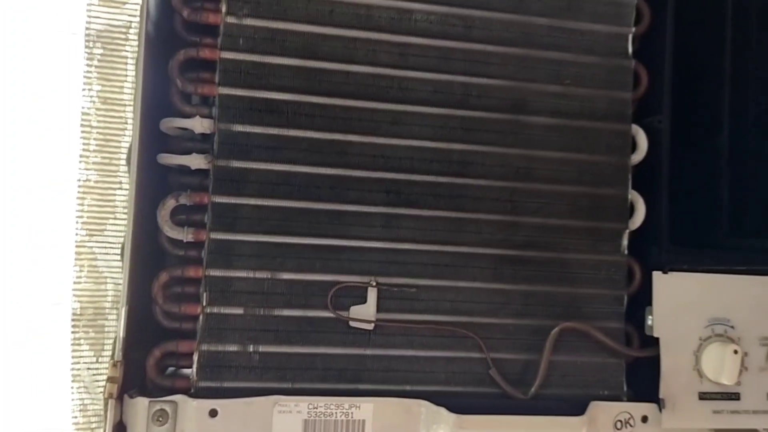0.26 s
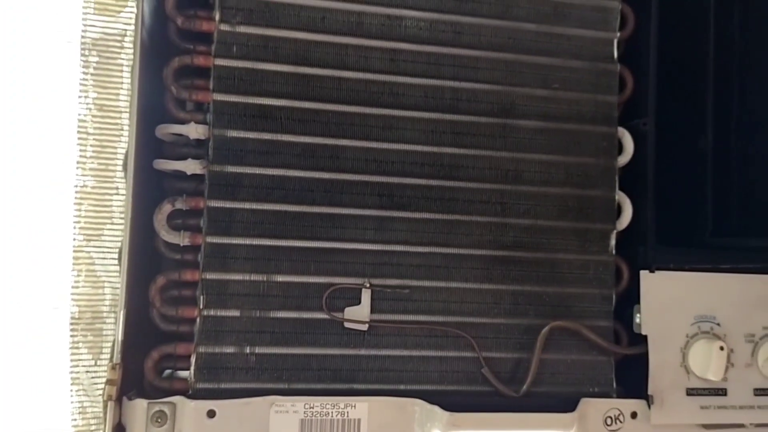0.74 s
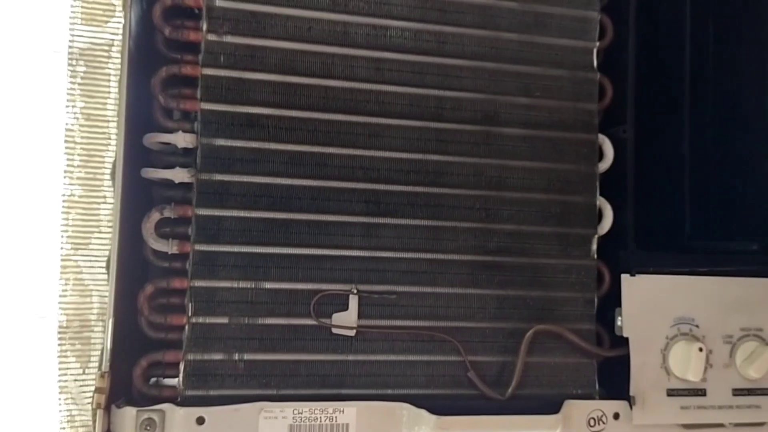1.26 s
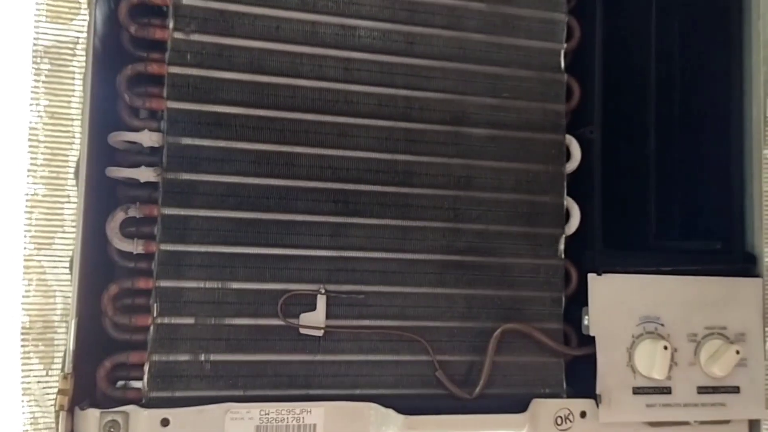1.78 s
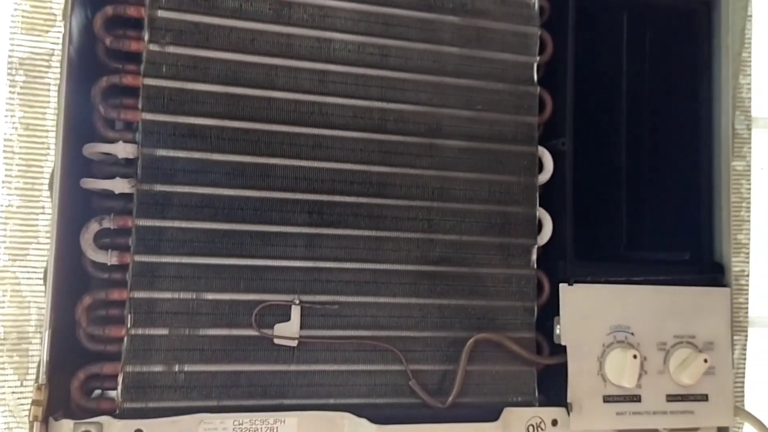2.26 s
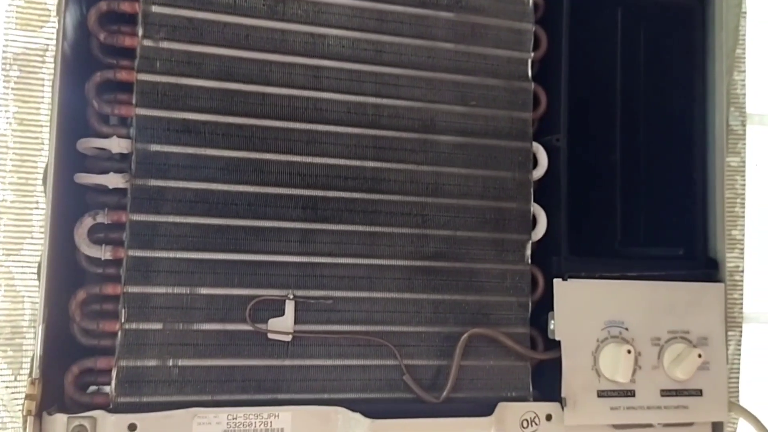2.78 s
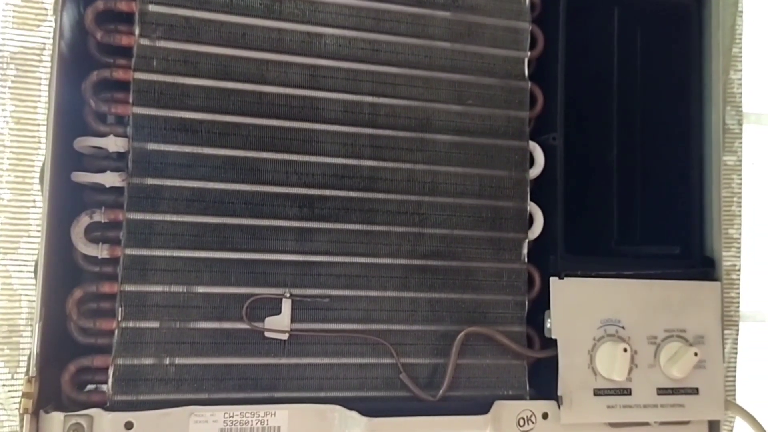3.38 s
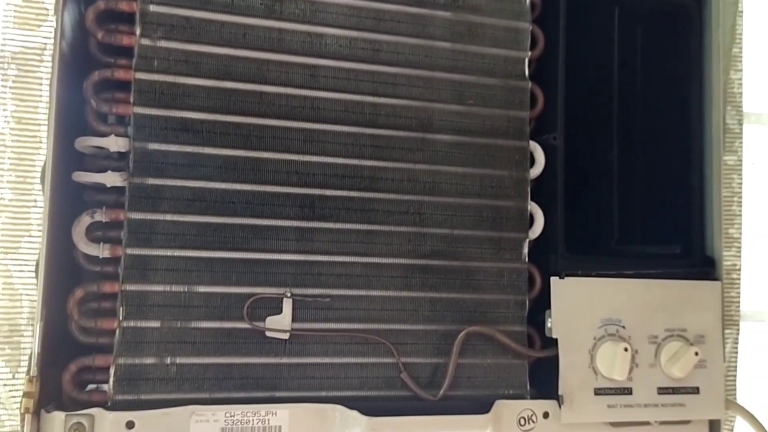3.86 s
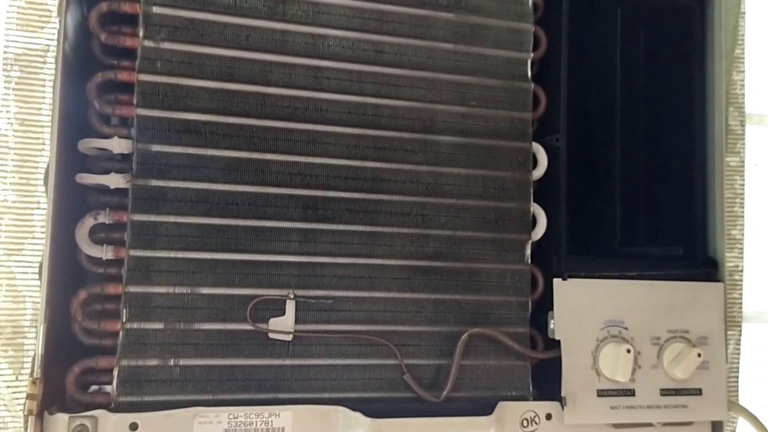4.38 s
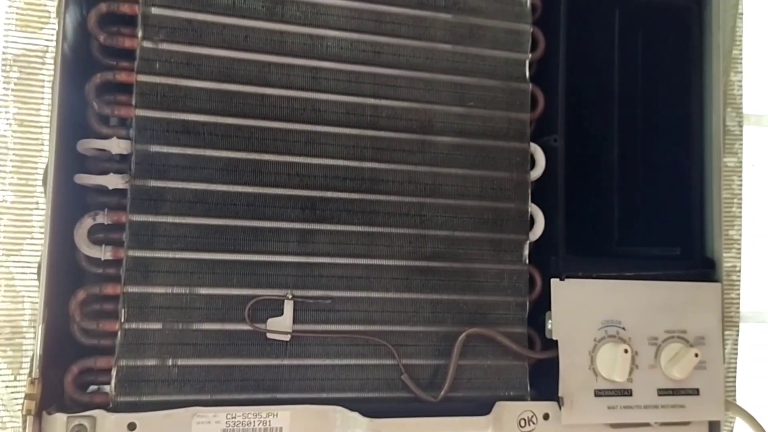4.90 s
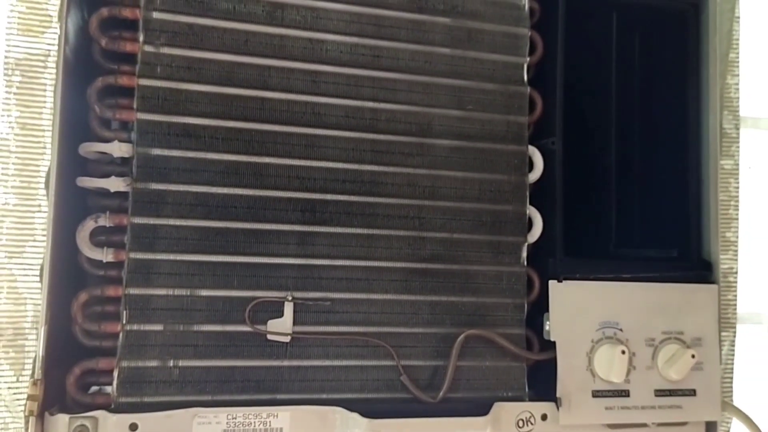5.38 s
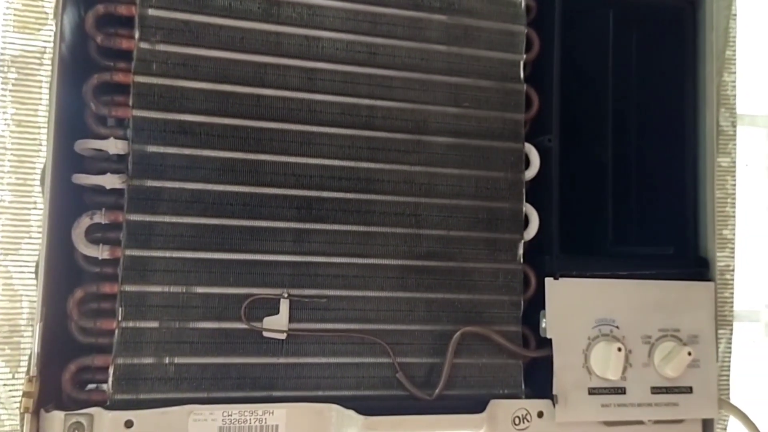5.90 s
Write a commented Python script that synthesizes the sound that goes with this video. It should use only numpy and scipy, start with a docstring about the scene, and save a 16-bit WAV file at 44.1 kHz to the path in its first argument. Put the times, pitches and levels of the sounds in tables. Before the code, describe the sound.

Indoors, close to an open window air conditioner, a deep steady compressor and fan hum throbs about three times a second beneath a soft rush of air. Thin whistles fade early as the hiss softens slightly. A single sharp tap hits the left side about one second in; later come faint ticks, light brushing and one dull, quiet knock. Handheld stereo microphone.

```python
"""Indoors, a window air conditioner runs steadily, its front cover off, close to a hand-held camera.
Its compressor sounds multiples of a shaft speed just below the mains; against the fan motor's magnetic
hum they beat about three times a second. The blower wheel adds tones, the cabinet faint steady ones.
Turbulent air rushes and hisses through the coil fins as shaped noise, with thin whistles at first.
One tap rings the camera by the left microphone; faint ticks, brushing puffs and a dull knock follow."""
import sys
import numpy as np
from scipy import signal
from scipy.fft import rfft, irfft, next_fast_len
from scipy.io import wavfile
from scipy.ndimage import uniform_filter1d

SR = 44100
rng = np.random.default_rng(int(sys.argv[2]) if len(sys.argv) > 2 else 0)


def generate_wav(signal):
    """Clip the signal to [-1, 1] and save it as 16-bit WAV at the path in sys.argv[1]."""
    frames = np.transpose(np.atleast_2d(signal))
    scaled = np.clip(frames, -1, 1) * 32767
    pcm = np.round(scaled).astype(np.int16)
    wavfile.write(sys.argv[1], SR, pcm)


N = 270789
TIME = np.arange(N) / SR  # s

MAINS_HZ, FAN_HZ = 59.842, 14.94  # supply frequency; turns of the blower wheel a second
# compressor shaft: turns a second at the start, slowly sagging under load
SHAFT_HZ, SAG_HZ_PER_S = 58.301, .0072
# the camera draws back from the fins, and their hiss falls from near to far
BACK_FROM_S, BACK_TAKES_S, NEAR_DB, FAR_DB = 0.63, 1.2, 1.0, -1.7
# it also turns: middle, half length, and extra delay of the hum at the left microphone before the turn
TURN_S, TURN_TAKES_S, TURN_DELAY_S = 3.7, 1, 0.000061
# on its way it crosses a crest of the hum's standing wave; HUM_DB is the gain away from the crest
CREST_S, CREST_WIDTH_S, CREST_DB, HUM_DB = 2.33, 0.89, 1.0, -0.64
EDGE_HZ = 15500  # upper band limit of the recorder

# strong compressor tones, before the standing wave:
# (multiple of shaft speed, left level [dB], right level [dB], extra level before the camera turns [dB])
SHAFT_TONES = [(1, -63, -61, 0), (2, -48.6, -48.2, 0), (3, -54.5, -56.5, 0), (4, -47.7, -49.3, 0),
               (5, -72, -70.5, 0), (6, -67, -64.3, 0), (7, -76, -75, 0), (8, -62.2, -60, 0),
               (9, -63, -60.7, 2), (10, -69.5, -70.5, 0), (11, -85, -78, 0), (12, -70.5, -73.5, 0),
               (13, -65.2, -75.5, 0), (14, -79, -72.5, 0), (17, -76, -75.5, 0), (18, -73.2, -69.5, 0),
               (21, -77, -87, 0), (24, -69, -74, -3.5), (25, -73, -80.5, 0), (26, -67.8, -77, 1.5),
               (27, -84, -77.5, 0), (28, -77, -83, 0), (29, -82, -83, 0), (63, -88, -87, 0),
               (76, -86, -90, 0)]
# buzz of valve and shell, filling in all other multiples: (frequency [Hz], level of each harmonic [dB])
SHELL_BUZZ = [(300, -71), (850, -75), (1250, -85), (1500, -80), (1700, -87), (2400, -94), (3100, -104),
              (3700, -95), (4300, -88), (5100, -98), (5800, -106), (6700, -100), (7700, -95), (9700, -108)]
# magnetic hum of the fan motor: (multiple of mains, level [dB], time in step with compressor [s])
MAGNETIC_HUM = [(2, -49.1, .287), (4, -65, .17)]
# blower wheel, the highest being the passing of its blades: (multiple of wheel speed, level [dB])
WHEEL_TONES = [(5, -65), (9, -58), (44, -71.5)]
# faint steady tones of the cabinet: (frequency [Hz], level [dB])
CABINET_TONES = [(189.7, -82), (203.4, -65), (204.6, -62.5), (306, -79.5), (422.7, -75)]
# rush of air, before the resonances: (frequency [Hz], spectral density [dB per Hz])
AIR_SPECTRUM = [(20, -99.6), (55, -93), (85, -81.5), (160, -76.5), (330, -84.8), (400, -82.8), (600, -86),
                (850, -88.3), (1150, -89.6), (1350, -92.2), (2400, -97.2), (3000, -102), (4400, -102.6),
                (5700, -108), (7300, -105.3), (9000, -109.3), (15300, -116)]
# resonances and notches of the air path: (frequency [Hz], width [Hz], level change [dB])
AIR_PATH = [(129, 8.1, 12), (200, 48, 3.5), (241.3, 7.2, 12.5), (254, 14, -4.5), (275, 70, 6.5),
            (324, 9.9, -2.5), (439.6, 18, 5.5), (469.7, 8.1, 13.8), (482, 8, -2.5), (517, 49, 6),
            (560, 7.4, -1), (581.5, 17, 7.5), (644, 12.3, 7.5), (755, 21, 6), (2630, 350, 0.4),
            (3020, 4000, -2), (4270, 310, 2.5), (5400, 620, -1)]
# level difference of the two microphones: (frequency [Hz], left minus right [dB])
MIC_LEAN = [(100, -0.1), (280, 0.2), (450, -1.7), (750, 0.6), (950, -1.4), (1250, 1.8), (2100, -1.3),
            (3000, -0.4), (4000, 3.1), (5100, 6.4), (6500, 3.0), (8500, 7.1), (11000, 4.6), (15000, 3.6)]
# likeness of the two microphones: (frequency [Hz], correlation [-1 to 1])
MIC_LIKENESS = [(60, 1), (150, 0.98), (290, 0.75), (640, 1), (1000, 0.29), (1400, 0), (3000, 0.086)]
# one swell of the middle of the rush: (time [s], half length [s], level [dB], centre [Hz], width [Hz])
RUSH_SWELL = (5.45, 0.25, 2.8, 610, 380)
# thin whistles of the fins, heard only from close by:
# (frequency [Hz], width [Hz], level [dB], time of fading [s])
FIN_WHISTLES = [(4280, 160, -84, 0.84), (7830, 170, -81, 1.67)]
# tap on the camera: (time [s], left level [dB], right level [dB])
CAMERA_TAPS = [(1.0688, -20, -50)]
# modes of the camera's body: (frequency [Hz], level relative to the tap [dB], 60 dB decay time [s])
BODY_MODES = [(1230, 5, 0.0026), (2180, -18, 0.0053), (3800, -6.5, 0.002), (6300, -28, 0.022),
              (6900, -8, 0.0029), (9600, -11, 0.002)]
# faint dry ticks: (time [s], level [dB], length [s], lowest frequency [Hz], highest frequency [Hz])
DRY_TICKS = [(2.129, -58, 0.0088, 2500, 14500), (4.463, -53, 0.0065, 8500, 11000),
             (5.715, -53, 0.012, 9500, 11200), (6.093, -55.5, 0.019, 7000, 11500)]
# soft brushing puffs: (time [s], level [dB], length [s])
BRUSH_PUFFS = [(2.718, -63, 0.07), (2.78, -62, 0.056), (4.68, -63.5, 0.078), (4.756, -66.5, 0.071)]
# dull knock in the cabinet: (time [s], level [dB], frequency [Hz], 60 dB decay time [s])
CABINET_KNOCKS = [(5.006, -42.5, 760, 0.12)]


def gain_of(db):
    """Definition of the decibel: amplitude gain is ten to the power of level over 20."""
    return 10 ** (np.asarray(db) / 20)


def evened(x):
    """Normalization by power: scales to rms 1."""
    return x / np.sqrt(np.mean(x ** 2) + 1e-20)


def read(points, hz):
    """Interpolation of a table along a logarithmic frequency axis."""
    f, value = np.transpose(points)
    return np.interp(np.log(hz + 1), np.log(f + 1), value)


def sides(lean_db):
    """Interaural-style level difference, shared equally as left and right gains."""
    return gain_of(np.array([[.5], [-.5]]) * lean_db)


def add(mix, s, sound):
    """Superposition: adds a stereo sound to the mix from time s."""
    part = mix[:, round(s * SR):][:, :sound.shape[1]]
    part += sound[:, :part.shape[1]]


def drift(rate):
    """Low-pass random process: a wander of rms 1, up to about rate swings a second."""
    hz = np.fft.rfftfreq(N, 1 / SR)[:400]
    phases = np.exp(2j * np.pi * rng.random(len(hz)))
    wander = irfft(phases / (1 + (hz / rate) ** 2), 4096)
    return evened(np.interp(np.linspace(0, len(wander) - 1, N), np.arange(len(wander)), wander))


def tone(turns, db):
    """Simple harmonic motion: a sinusoid of the given rms level."""
    return np.sqrt(2) * gain_of(db) * np.cos(2 * np.pi * turns)


def lag(order):
    """Phase lag, in cycles: the springy cabinet passes on each higher order a little later."""
    return .5 + .1 * order ** 2


def band_pass(low_hz, high_hz):
    """Butterworth band-pass filter, as second-order sections."""
    return signal.butter(2, [low_hz, high_hz], "band", fs=SR, output="sos")


def patchy(z, size, count=8, low_hz=400, high_hz=12000, patchy_db=1.0, rate=5):
    """Independent modulation of bands: each swells and sinks on its own, so the colour drifts."""
    place = np.log(np.fft.rfftfreq(size, 1 / SR) + 1)
    centres = np.log(np.geomspace(low_hz, high_hz, count))
    out = 0
    for band in np.eye(count):  # overlapping bands whose weights sum to one
        sound = irfft(z * np.interp(place, centres, band), size)[:, :N]
        out = out + sound * gain_of(patchy_db * drift(rate))
    return out


def compressor(turns, size=4096, ring_turns=1.0):
    """Periodicity makes harmonics: a valve snap ringing in the shell, repeated every turn, buzzes."""
    order = np.arange(size // 2 + 1)
    hz = order * SHAFT_HZ
    snap = rng.standard_normal((2, size)) * np.exp(-np.arange(size) / size / ring_turns)
    ring = rfft(evened(snap)) / np.sqrt(size)
    ring *= gain_of(read(SHELL_BUZZ, hz)) * sides(read(MIC_LEAN, hz))
    # leave out the multiples that sound as strong tones
    strong = np.isin(order, [row[0] for row in SHAFT_TONES])
    lines = ring * (order > 0) * (hz < SHELL_BUZZ[-1][0]) * ~strong
    stroke = irfft(lines) * size / np.sqrt(2)
    place = np.arange(size + 1) / size
    return np.array([np.interp(turns % 1, place, np.append(s, s[0])) for s in stroke])


def compressor_tones(turns, far_delay_s=0.00013):
    """Difference in arrival time: the shaft's harmonics lag at the left, less once the camera turns."""
    close = .5 - .5 * np.tanh((TIME - TURN_S) / TURN_TAKES_S)
    delay_turns = SHAFT_HZ * (far_delay_s + TURN_DELAY_S * close)
    heard_turns = turns - np.array([[.5], [-.5]]) * delay_turns
    out = 0
    for k, left_db, right_db, close_db in SHAFT_TONES:
        level_db = np.array([[left_db], [right_db]]) + close_db * close
        out = out + tone(k * heard_turns - lag(k), level_db)
    return out


def fan_motor(shaft_turns, waver=0.098):
    """Beating: mains hum drifts in and out of step with the shaft; wheel and cabinet tones waver."""
    hum = 0
    for k, db, s in MAGNETIC_HUM:
        mains_turns = MAINS_HZ * (TIME - s) + np.interp(s, TIME, shaft_turns)
        hum = hum + tone(round(k) * mains_turns - lag(k), db)
    wheel_turns = FAN_HZ * TIME + 0.0048 * drift(0.15)
    wheel = sum(tone(round(k) * wheel_turns + rng.random(), db) for k, db in WHEEL_TONES)
    cabinet = sum(tone(hz * TIME + rng.random(), db) for hz, db in CABINET_TONES)
    return hum + (wheel + cabinet) * (1 + waver * drift(0.58))


def airflow(shaft_turns, ripple_db=3.0, wobble=0.065, pulsing=0.58, pulse_turns=0.12,
            gust_db=0.4, hiss_hz=3000):
    """Filtered, modulated turbulence: wheel wobble sways the rush, compressor strokes pulse the hiss."""
    size = next_fast_len(N)
    hz = np.fft.rfftfreq(size, 1 / SR)
    left, other = rfft(rng.standard_normal((2, size)))
    same = np.clip(read(MIC_LIKENESS, hz), -1, 1)
    z = np.array([left, same * left + np.sqrt(1 - same ** 2) * other])
    path_db = sum(db / (1 + (2 * (hz - f) / width) ** 2) for f, width, db in AIR_PATH)
    level_db = read(AIR_SPECTRUM, hz) + path_db
    # reflections ripple the spectrum, differently at each microphone
    ripple = evened(uniform_filter1d(rng.standard_normal(z.shape), size=400, axis=1))
    ripple *= np.sqrt(1 - same ** 2)
    z *= gain_of(level_db + ripple_db * ripple) * sides(read(MIC_LEAN, hz)) * np.sqrt(SR / 2)

    treble = hz ** 4 / (hz ** 4 + hiss_hz ** 4)
    rush = patchy(z * (1 - treble), size) * (1 + wobble * np.cos(2 * np.pi * FAN_HZ * TIME))
    hiss = patchy(z * treble, size, patchy_db=0.3)
    hiss = hiss * (1 + pulsing * (np.exp(-(shaft_turns % 1) / pulse_turns) - pulse_turns))

    s, half, swell_db, centre_hz, width_hz = RUSH_SWELL
    middle = irfft(z * np.exp(-(2 * (hz - centre_hz) / width_hz) ** 2), size)[:, :N]
    rush = rush + middle * (gain_of(swell_db * np.exp(-((TIME - s) / half) ** 2)) - 1)
    # the fins' hiss softens as the camera draws back
    receding = np.exp(-np.maximum(TIME - BACK_FROM_S, 0) / BACK_TAKES_S)
    nearness_db = FAR_DB + (NEAR_DB - FAR_DB) * receding
    return (rush + hiss * gain_of(nearness_db)) * gain_of(gust_db * drift(28))


def whistles(fade_s=0.08, lean_db=8):
    """Narrow-band resonance of air noise, falling away as the camera leaves the fins."""
    hz, out = np.fft.rfftfreq(N, 1 / SR), np.zeros((2, N))
    for centre, width, db, until in FIN_WHISTLES:
        resonance = 1 / (1 + (2 * (hz - centre) / width) ** 2)
        band = irfft(rfft(rng.standard_normal((2, N))) * resonance, N)
        out += evened(band) * gain_of(db) * (.5 - .5 * np.tanh((TIME - until) / fade_s))
    return out * sides(lean_db)


def taps(size=2048, low_hz=570, high_hz=8500, rise_s=0.000064, scatter_db=-27.5, scatter_t60=0.093):
    """Impulse response: a hard contact excites the body's damped modes; nearby surfaces scatter it back."""
    out, t = np.zeros((2, N)), np.arange(size) / SR
    modes = sum(gain_of(db - 60 * t / t60) * np.sin(2 * np.pi * hz * t) for hz, db, t60 in BODY_MODES)
    ring = np.minimum(t / rise_s, 1) * modes
    band = band_pass(low_hz, high_hz)
    for s, left_db, right_db in CAMERA_TAPS:
        scatter_level_db = left_db + scatter_db - 60 * t / scatter_t60
        scatter = rng.standard_normal((2, size)) * gain_of(scatter_level_db)
        direct = gain_of([[left_db], [right_db]]) * ring
        add(out, s, signal.sosfilt(band, direct + scatter))
    return out


def ticks(lean_db=7):
    """Exponential decay: bright specks of band-passed noise die quickly."""
    out = np.zeros((2, N))
    for s, db, length, low_hz, high_hz in DRY_TICKS:
        t = np.arange(0, length, 1 / SR)
        speck = rng.standard_normal((2, len(t))) * gain_of(db - 30 * t / length)
        add(out, s, signal.sosfilt(band_pass(low_hz, high_hz), speck) * sides(lean_db))
    return out


def puffs(low_hz=5000, high_hz=9800, lean_db=5):
    """Amplitude envelope: half a sine swells bright noise softly, as of a sleeve brushing."""
    out = np.zeros((2, N))
    band = band_pass(low_hz, high_hz)
    for s, db, length in BRUSH_PUFFS:
        swell = np.sin(np.pi * np.arange(0, length, 1 / SR) / length)
        brush = signal.sosfilt(band, rng.standard_normal((2, len(swell))) * swell)
        add(out, s, brush * gain_of(db) * sides(lean_db))
    return out


def knocks(rise_s=0.018, lean_db=2):
    """Damped free vibration: a nudged cabinet panel rings briefly on one note."""
    out = np.zeros((2, N))
    for s, db, hz, t60 in CABINET_KNOCKS:
        t = np.arange(0, t60, 1 / SR)
        ring = np.minimum(t / rise_s, 1) * tone(hz * t, db - 60 * t / t60)
        add(out, s, ring * sides(lean_db))
    return out


def scene():
    """Superposition of all sources; one shaft phase paces hum, buzz and hiss."""
    shaft_turns = np.cumsum(SHAFT_HZ - SAG_HZ_PER_S * TIME) / SR
    standing_db = HUM_DB + CREST_DB * np.exp(-((TIME - CREST_S) / CREST_WIDTH_S) ** 2)
    hum = compressor(shaft_turns) + compressor_tones(shaft_turns) + fan_motor(shaft_turns)
    hum = hum * gain_of(standing_db)
    return hum + airflow(shaft_turns) + whistles() + taps() + ticks() + puffs() + knocks()


def record(dry):
    """Band limitation: the recorder's linear-phase low-pass filter."""
    lowpass = signal.firwin(1023, EDGE_HZ, window=("kaiser", 9), fs=SR)
    return signal.oaconvolve(dry, lowpass[None], "same")


dry = scene()
out = record(dry)
generate_wav(out)
```